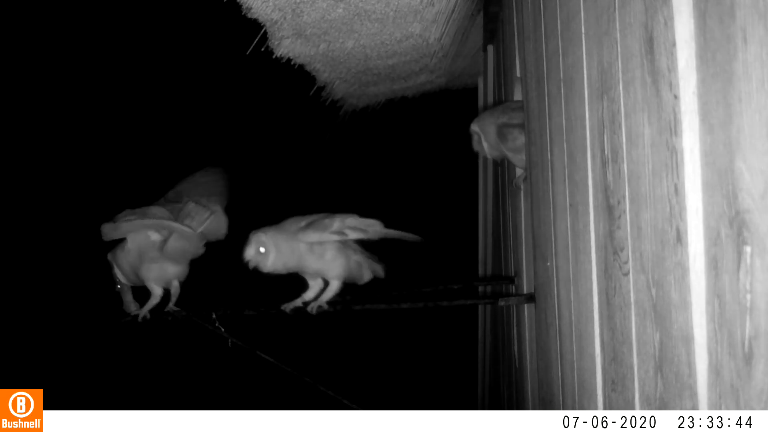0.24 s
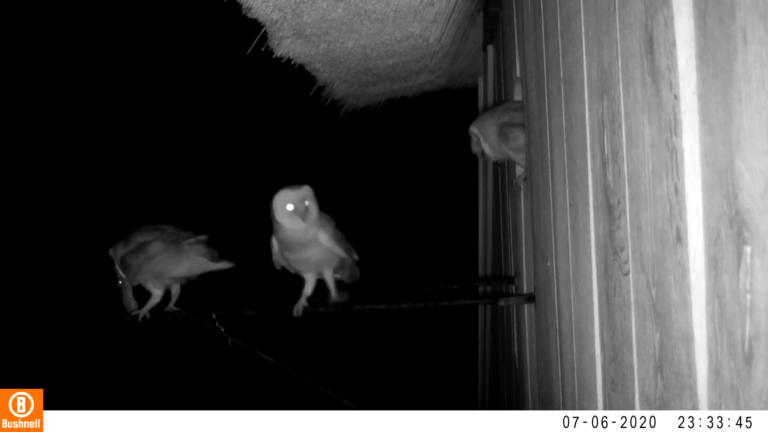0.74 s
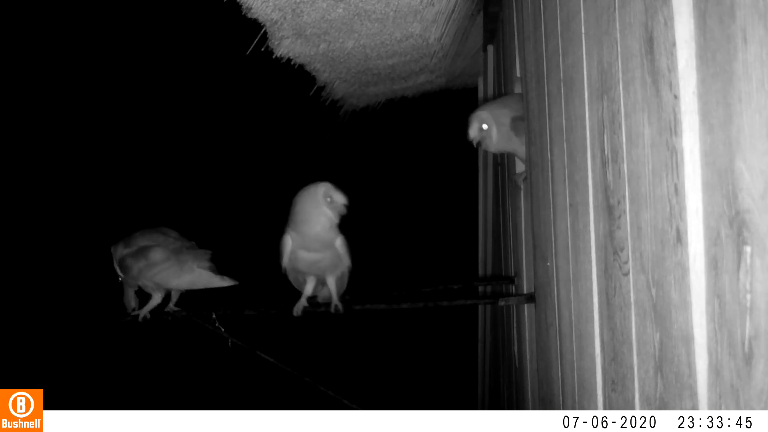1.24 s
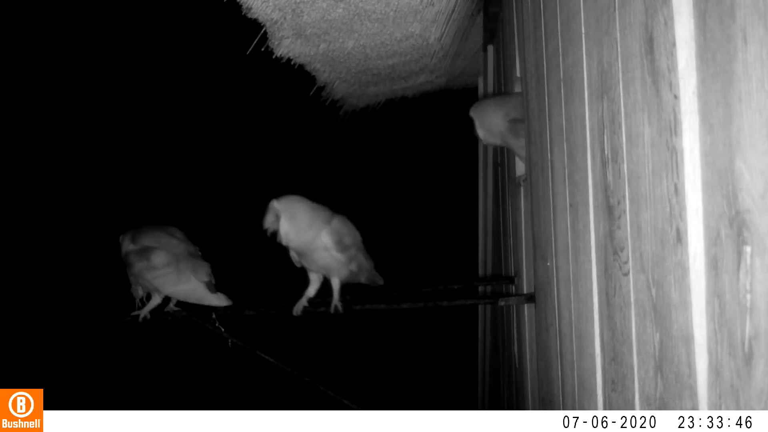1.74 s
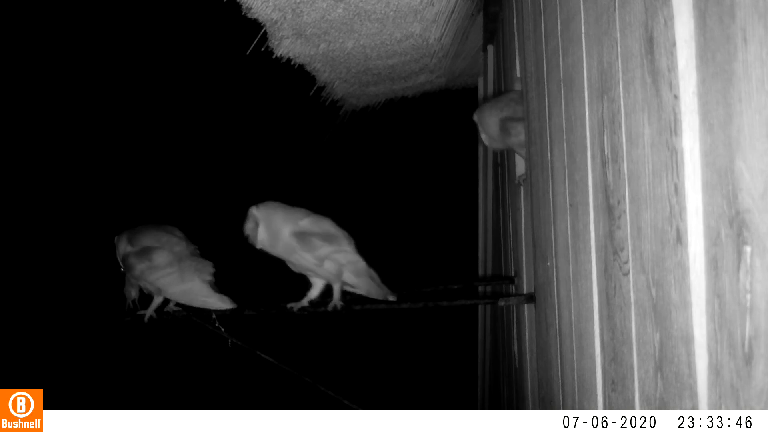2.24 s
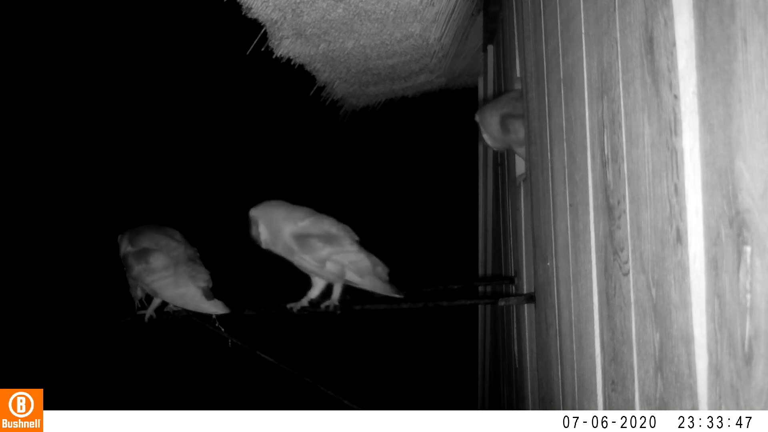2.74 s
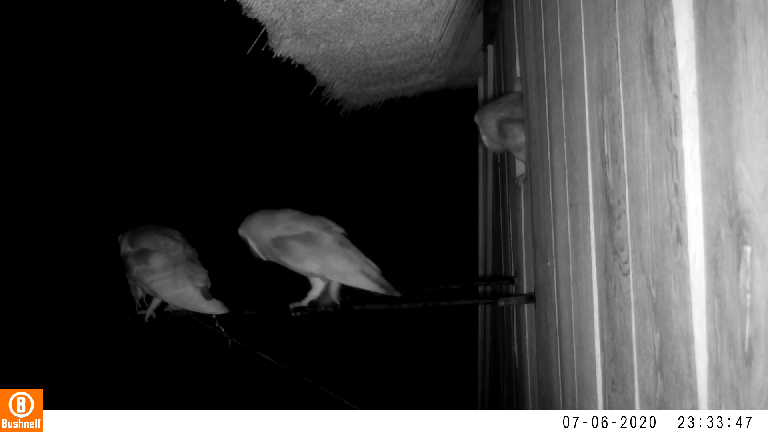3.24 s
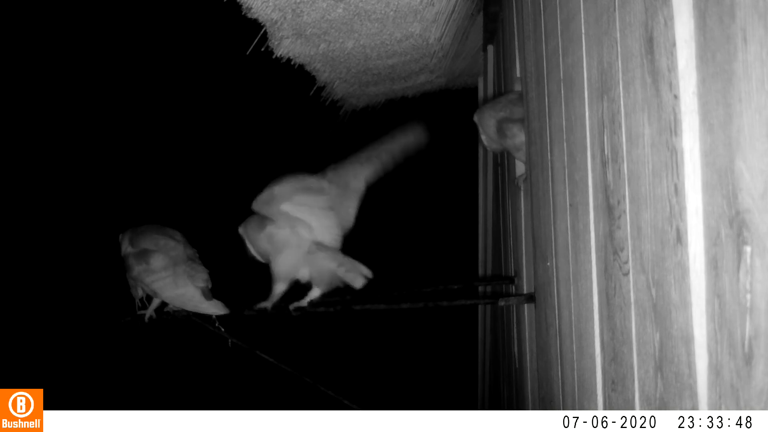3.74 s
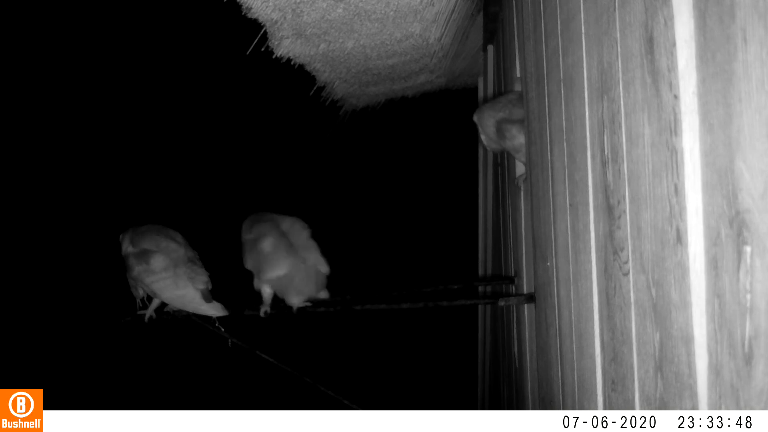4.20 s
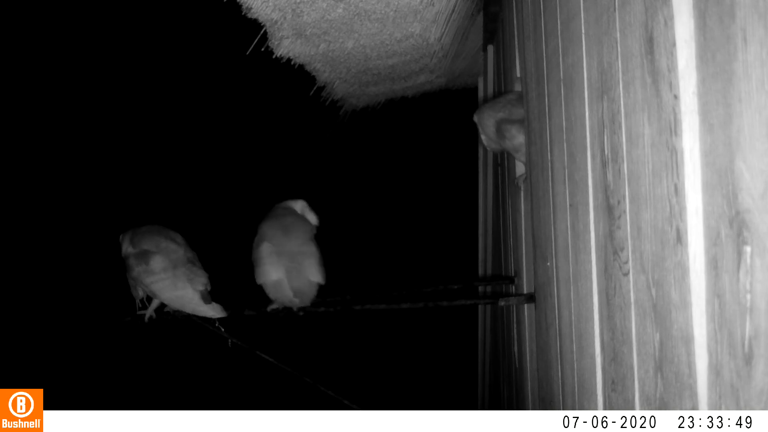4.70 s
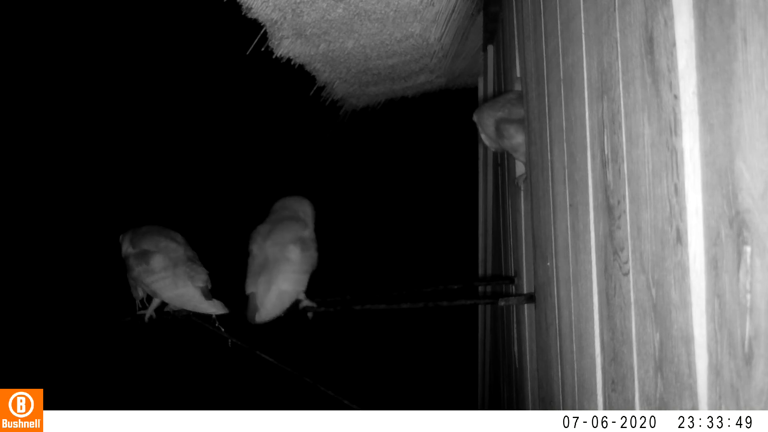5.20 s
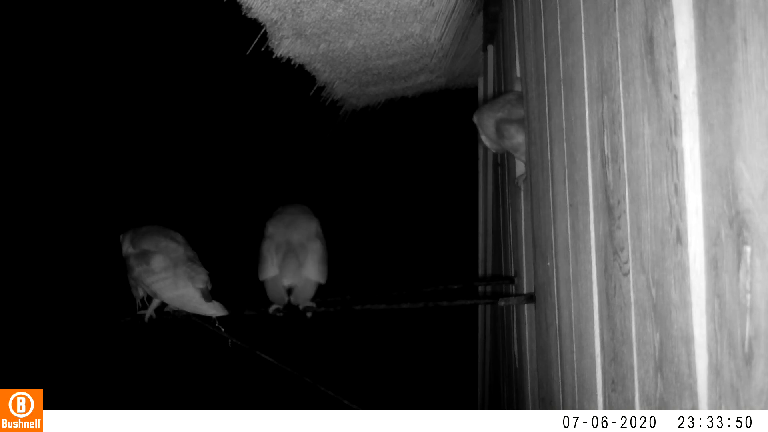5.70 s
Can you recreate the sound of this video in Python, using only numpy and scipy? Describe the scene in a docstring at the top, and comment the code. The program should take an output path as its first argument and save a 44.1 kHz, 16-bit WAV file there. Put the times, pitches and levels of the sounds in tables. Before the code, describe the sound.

Young barn owls beg at night with long harsh rasping hisses, one close and loud, siblings answering in turn over a soft air hush.

```python
"""Begging owlets at a nest box

Young barn owls beg at night beside a wooden nest box, near a small weatherproof camera.
One owlet close by rasps three times; a sibling further along the perch and one in the box answer in the pauses.
Each rasp is noise ringing four throat resonances; clear whistles and beak clicks mark some calls.
Claws knock the perch, wall and yard give an echo, and the night air is a soft hush.
The camera gates its noise in the pauses and overloads on the loudest call."""
import sys
import numpy as np
from scipy import signal
from scipy.fft import rfft, irfft, next_fast_len
from scipy.io import wavfile
from scipy.ndimage import uniform_filter1d

SR = 44100
rng = np.random.default_rng(int(sys.argv[2]) if len(sys.argv) > 2 else 0)


def master_out(mix):
    """Clip the mix to full scale and print it as 16-bit PCM to the path in sys.argv[1]."""
    frames = np.transpose(np.atleast_2d(mix))
    ceiling = np.clip(frames, -1, 1)
    pcm = np.round(ceiling * 32767).astype(np.int16)
    wavfile.write(sys.argv[1], SR, pcm)


N = 262395

# colour of the near owl's calls: its open beak, then the camera microphone's steep fall above 5 kHz: hz,
# level_db
NEAR_COLOUR = [(150, -34.5), (500, -27.5), (1000, -5), (2000, -0.5), (2900, -1.5), (3090, -4.5),
               (3280, -2), (4280, -1.5), (4420, -8), (4750, -8.5), (5200, -21.5), (6350, -20.5),
               (6850, -30), (8500, -38), (10500, -60.5)]


def gain_of(db):
    """Decibels to a gain."""
    return 10 ** (np.asarray(db) / 20)


def evened(x):
    """Scales to an rms of 1."""
    return x / np.sqrt(np.mean(x ** 2) + 1e-20)


def add(mix, start_s, sound):
    """Mixes a sound in at start_s."""
    part = mix[round(start_s * SR):][:len(sound)]
    part += sound[:len(part)]


def coloured(x, points):
    """Filters by a spectrum of (hz, db) points, interpolated over log frequency."""
    size = next_fast_len(len(x) + 4096)
    points_hz, points_db = np.transpose(points)
    hz = np.fft.rfftfreq(size, 1 / SR)
    db = np.interp(np.log(hz + 1), np.log(points_hz + 1), points_db)
    return irfft(rfft(x, size) * gain_of(db), size)[:len(x)]


def resonate(x, hz, width_hz):
    """Shifts the curve hz down to zero, smooths, and shifts back: a resonance of gain 1."""
    turn = np.exp(2j * np.pi * np.cumsum(hz * np.ones(len(x))) / SR)
    pole = np.exp(-np.pi * width_hz / SR)
    smooth = signal.lfilter([1 - pole], [1, -pole], x / turn + 1e-18)
    return 2 * (turn * smooth).real


def drift(length, seconds):
    """Smooth chance of rms 1 that changes within the given time."""
    span = max(int(seconds * SR), 2)
    once = uniform_filter1d(rng.standard_normal(length), span)
    return evened(uniform_filter1d(once, span))


def ring(modes):
    """A tap's ring: dying sines from (hz, db, t60_s), peak 1."""
    t = np.arange(SR // 4) / SR
    out = sum(gain_of(db - 60 * t / t60_s) * np.sin(2 * np.pi * hz * t) for hz, db, t60_s in modes)
    return out / abs(out).max()


def night():
    """Night air through the microphone port: a smooth, broad hush with a slow swell."""
    # hush spectrum: hz, level_db (per Hz)
    air_spectrum = [(20, -27), (120, -15.5), (250, -10), (600, -4.5), (1300, 0), (2300, -2.5),
                    (3200, -10.5), (4200, -16.5), (5000, -24), (6500, -37.5), (9000, -51)]
    level_db = -48 + .5 * drift(N, 0.17)
    return gain_of(level_db) * evened(coloured(rng.standard_normal(N), air_spectrum))


def flicker():
    """Twice-resonated noise: faint high bands that come and go in the pauses."""
    # treble bands: start_s, end_s, centre_hz, width_hz (each pass), level_db
    bands = [(0., .45, 15200, 2530, -79), (3.223, 3.443, 11400, 3530, -74.5),
             (4.65, 4.883, 11100, 3500, -73.5)]
    mix = np.zeros(N)
    for start_s, end_s, hz, width_hz, db in bands:
        length = int((end_s - start_s) * SR)
        once = resonate(rng.standard_normal(SR)[:length], hz, width_hz)
        band = evened(resonate(once, hz, width_hz))
        level = gain_of(db + 1.5 * drift(SR, 0.016)[:length])
        add(mix, start_s, level * band * signal.windows.tukey(length, .4))
    return mix


def perch():
    """Each shift of the claws is a short rub that rings the wooden bar."""
    # claw shifts: start_s, peak_db, length_s (of the rub)
    knocks = [(.53, -53, .05), (2.0, -56, .05), (3.45, -52, .12), (4.745, -46, .08)]
    # modes of the bar: hz, level_db, t60_s
    bar_modes = [(190, 0, .1), (245, -1, .1), (330, -9, .05)]
    mix = np.zeros(N)
    for start_s, peak_db, length_s in knocks:
        length = int(length_s * SR)
        rub = rng.standard_normal(SR // 4)[:length] * np.hanning(length)
        knock = signal.fftconvolve(rub, ring(bar_modes))
        add(mix, start_s, gain_of(peak_db) * knock / abs(knock).max())
    return mix


def wall(x):
    """Sparse reflections from boards and thatch; their paths change as the owls sway."""
    wall_t60_s, yard_t60_s, yard_db = 0.13, 1.0, -20  # yard re wall
    path_count, path_s = 6, .05
    at = np.arange(200, 3 * SR // 4 - 20, 20)
    decay = gain_of(-60 * at / SR / wall_t60_s)
    decay = decay + gain_of(yard_db - 60 * at / SR / yard_t60_s)  # quieter and longer
    t = np.arange(N) / SR
    out = np.zeros(N)
    for k in range(path_count):
        taps = np.zeros(3 * SR // 4)
        taps[at + rng.integers(0, 20, len(at))] = rng.choice([-1., 1.], len(at)) * decay
        tail = coloured(taps, [(1000, -14.5), (2500, 2.5), (3600, 10.0), (4500, 5), (6000, -9.5)])
        # cyclic crossfade from each path to the next
        away = abs((t / path_s - k) % path_count - path_count / 2)
        share = np.cos(np.pi / 2 * np.minimum(away, 1))
        out += signal.oaconvolve(x * share, tail / np.linalg.norm(tail))[:N]
    return out


def beak_click():
    """The beak clicks open: a scrape of a few milliseconds rings its modes; peak 1."""
    # beak modes: hz, level_db, t60_s
    beak_modes = [(1050, 0, .012), (1900, -2, .004), (2800, -2, .004), (3900, -3, .005)]
    scrape = rng.standard_normal(250) * np.exp(-np.arange(250) / 110.0)
    click = signal.fftconvolve(scrape, ring(beak_modes)[:1500])
    click = coloured(click, [(300, -17.5), (900, 1.0), (4400, -4.5), (5200, -33)])
    return click / abs(click).max()


def whistle(length_s, from_hz, to_hz, glide_s, db):
    """At low air pressure the membranes swing evenly: a short glide."""
    octave_db = -12  # second partial
    t = np.arange(0, length_s, 1 / SR)
    hz = to_hz + (from_hz - to_hz) * np.exp(-t / glide_s)
    phase = 2 * np.pi * np.cumsum(hz) / SR
    tone = np.sin(phase) + gain_of(octave_db) * np.sin(2 * phase)
    return gain_of(db) * tone * signal.windows.tukey(len(t), .25)


def throat_band(length, hz, width_hz, wander, focus):
    """Noise in a wandering resonance: a narrow ridge on a broad skirt."""
    hz = hz * (1 + wander * drift(length, 0.0054))
    skirt = evened(resonate(rng.standard_normal(length), hz, width_hz))
    ridge = evened(resonate(skirt, hz, width_hz / 2))
    return evened(skirt + focus * ridge)


def rasp(owl, length_s, top_db, rise_db, swell_s, climb_db_per_s, dying_db_per_s, pipe_hz,
         beak0_hz, beak1_hz, late_db, shares_db, colour, widths, gullet_hz, upper_hz, wander):
    """Membranes flap chaotically; their noise rings four unsteady throat resonances. Effort builds, climbs, dies."""
    # share change with effort, by owl: pipe, gullet, upper (dB per dB below top effort)
    soft_shares = dict(near=(0.25, 0.26, -.3), far=(-0.56, 0.05, -0.57), box=(.1, .1, -.1))
    # drop of the windpipe resonance as a call dies, by owl: slacken_hz_per_s
    slacken_hz_per_s = dict(near=45000, far=3000, box=0)
    # windpipe resonance rises early, sags mid-call, recovers: call_share (0-1), shift_hz
    pipe_arch = [(0, -50), (.16, 80), (.58, -60.5), (.92, 39.5), (1, 29.5)]
    silent_db, slack_hz = 36, 1100  # dying range, lowest windpipe resonance
    sag_db, sag_s = 2.5, 0.058  # breath runs short just before the end
    fade_s, flutter_db, flutter_s = 0.0045, .4, 0.0017

    t = np.arange(0, length_s + silent_db / dying_db_per_s, 1 / SR)
    left_s = np.maximum(length_s - t, 0)
    dying_s = np.maximum(t - length_s, 0)
    swell = np.exp(-t / swell_s)
    below_db = rise_db * swell + climb_db_per_s * left_s
    effort_db = top_db - below_db - sag_db * np.exp(-left_s / sag_s) - dying_db_per_s * dying_s

    pipe_db, gullet_db, upper_db = (db + k * below_db for db, k in zip(shares_db, soft_shares[owl]))
    gullet_db = gullet_db - late_db * swell

    pipe_hz = pipe_hz + np.interp(t / length_s, *np.transpose(pipe_arch))
    pipe_hz = np.maximum(pipe_hz - slacken_hz_per_s[owl] * dying_s, slack_hz)
    beak_hz = np.interp(t, [0, length_s], [beak0_hz, beak1_hz])
    centres_hz = (pipe_hz, beak_hz, gullet_hz, upper_hz)
    pipe, beak, gullet, upper = (throat_band(len(t), hz, width_hz, wander, focus=0.23)
                                 for hz, width_hz in zip(centres_hz, widths))
    voice = gain_of(pipe_db) * pipe + gain_of(gullet_db) * gullet
    voice = voice + gain_of(-2.5) * beak + gain_of(upper_db) * upper

    edges = np.clip(np.minimum(t, t[-1] - t) / fade_s, 0, 1)
    level = gain_of(effort_db + flutter_db * drift(len(t), flutter_s))
    return coloured(level * voice * edges, colour)


def surges():
    """Gain curve: the loudest call swells in short surges, each about six milliseconds long."""
    # surges, adding in dB where they overlap: centre_s, gain_db
    surge_rows = [(.921, 4), (1.093, 3), (1.145, 5), (1.184, 5), (1.198, 5), (1.216, 6), (1.244, 7),
                  (1.258, 6), (1.269, 6)]
    t = np.arange(N) / SR
    return gain_of(sum(db * np.exp(-((t - s) / .003) ** 2) for s, db in surge_rows))


def owls():
    """All calls, each through its owl's throat and beak and the camera microphone, with whistles and beak
    clicks."""
    # throats: widths (Hz: windpipe, beak, gullet, upper rasp), gullet_hz, upper_hz, wander (0-1)
    near_throat = dict(widths=(503, 288, 360, 409), gullet_hz=3487, upper_hz=4680, wander=0.017)
    far_throat = dict(widths=(300, 280, 465, 650), gullet_hz=3450, upper_hz=4620, wander=0.014)
    box_throat = dict(widths=(450, 350, 500, 500), gullet_hz=3330, upper_hz=4540, wander=0.015)
    # colour of the far and boxed owls' calls, including the camera microphone's treble fall: hz, level_db
    far_colour = [(500, -44), (2000, -21), (2450, -6), (2700, -2.5), (3200, -1), (4700, -1.5), (5500, -16),
                  (6500, -26.5), (7300, -42.5), (8300, -32.5), (9300, -31.5), (10300, -51)]
    box_colour = [(500, -40), (1800, -21.5), (2150, 7.5), (3000, 2.5), (4700, -1), (5300, -15), (6500, -18),
                  (11000, -50)]
    # calls: owl, start_s, length_s (to the dying), top_db (effort at the end, before the sag),
    # rise_db (start below top), swell_s, climb_db_per_s, dying_db_per_s, pipe_hz, beak0_hz, beak1_hz,
    # late_db (gullet below its share at first), pipe_db, gullet_db, upper_db (shares at top effort)
    calls = [ ("box", 0., 0.0031, -44.5, 0, .1, 0, 190, 3100, 3600, 3900, 0, -10.5, -2.7, -18),
             ("near", .457, 0.913, -17.5, 14.2, 0.14, 8.4, 614, 2510, 3810, 3820, 0, -4.5, -6.5, -21.5),
             ("far", 1.38, 0.8, -22, 9.7, 0.36, 0, 700, 2880, 3990, 3845, 1, -12, -9, -9),
             ("near", 2.244, .96, -21, 14.3, 0.12, 3.9, 880, 2447, 3810, 4014, 0.96, -5.5, -9, -22),
             ("far", 3.385, 0.46, -30.5, 12.8, 0.097, 14, 150, 2910, 3820, 3780, 1, -6.5, -2.5, -6),
             ("far", 3.89, 0.45, -35, 2.5, 0.094, -1.3, 200, 2800, 4170, 3880, 23, 0, -2.5, -15.5),
             ("box", 4.24, .37, -37, 13, 0.061, 2.4, 164, 2430, 3960, 3940, 1, -14, -8.5, -18),
             ("near", 4.862, 0.98, -21, 18.7, 0.13, 4, 540, 2483, 3900, 4020, 3, -5.5, -11, -19.5),
             ("far", 5.85, .1, -31.5, 2, 0.071, 3, 500, 2880, 3980, 4050, 0, -8, -8.5, -22), ]
    # whistles as a call starts or dies: start_s, length_s, from_hz, to_hz, glide_s, level_db (before colour)
    glides = [(.43, .034, 1200, 2680, .0055, -40), (2.24, .022, 2100, 2500, .006, -47),
              (4.842, .034, 1200, 2230, .007, -43), (5.836, .026, 2400, 900, .02, -50)]
    # clicks before a call: start_s, peak_db
    clicks = [(.427, -36), (4.841, -36)]
    voices = dict(near=(NEAR_COLOUR, near_throat), far=(far_colour, far_throat),
                  box=(box_colour, box_throat))
    mix = np.zeros(N)
    for owl, start_s, *shape, pipe_db, gullet_db, upper_db in calls:
        colour, throat = voices[owl]
        add(mix, start_s, rasp(owl, *shape, (pipe_db, gullet_db, upper_db), colour, **throat))
    mix *= surges()
    for start_s, *glide in glides:
        add(mix, start_s, coloured(whistle(*glide), NEAR_COLOUR))
    for start_s, peak_db in clicks:
        add(mix, start_s, gain_of(peak_db) * beak_click())
    return mix


def scene():
    """Owls, wall, perch and night air."""
    wall_db = -18
    birds = owls()
    return (birds + gain_of(wall_db) * wall(birds) + perch() + night())[None]


def record(dry):
    """A noise gate lowers the quiet moments; then limiter, clipping, amplifier noise and the band limit."""
    # amplifier's own low noise: hz, level_db (per Hz)
    rumble_spectrum = [(15, -9.5), (55, -4), (150, -3.5), (400, -22.5), (2000, -64)]
    gate_db, gate_depth_db, gate_lag_s = -44.5, 8.5, .04
    limit_knee, limit_room, clip_level, bias_slip = .2, .115, .303, 7.
    hiss_db, hiss_depth_db, rumble_db, edge_hz = -72.5, 11.5, -78, 15700

    power_db = 10 * np.log10(abs(uniform_filter1d(dry[0] ** 2, 700)) + 1e-12)
    quiet = 1 / (1 + np.exp(np.clip((power_db - gate_db) / 1.2, -50, 50)))
    quiet = uniform_filter1d(quiet, 300)
    keep = np.exp(-1 / (gate_lag_s * SR))
    lagged = signal.lfilter([1 - keep], [1, -keep], quiet, zi=[.6])[0]
    shut = np.minimum(quiet, lagged)  # opens at once, closes slowly
    gated = dry * gain_of(-gate_depth_db * shut)

    # fast limiter rounds off the swells
    swing = abs(signal.hilbert(gated, next_fast_len(N))[:, :N]) + 1e-9
    over = np.maximum(swing - limit_knee, 0)
    held = gated * (1 - (over - limit_room * np.tanh(over / limit_room)) / swing)

    # each overload shifts the amplifier's bias: a low bump
    loud = np.clip(held, -clip_level, clip_level)
    overload = uniform_filter1d(abs(held - loud), 40)
    loud -= bias_slip * uniform_filter1d(overload, 40)

    hiss = gain_of(hiss_db - hiss_depth_db * shut) * rng.standard_normal(N)
    rumble = gain_of(rumble_db) * evened(coloured(rng.standard_normal(N), rumble_spectrum))
    band_limit = signal.firwin(511, edge_hz, window=("kaiser", 9), fs=SR)
    return signal.oaconvolve(loud + hiss + rumble + flicker(), band_limit[None], "same")


dry = scene()
out = record(dry)
master_out(out)
```